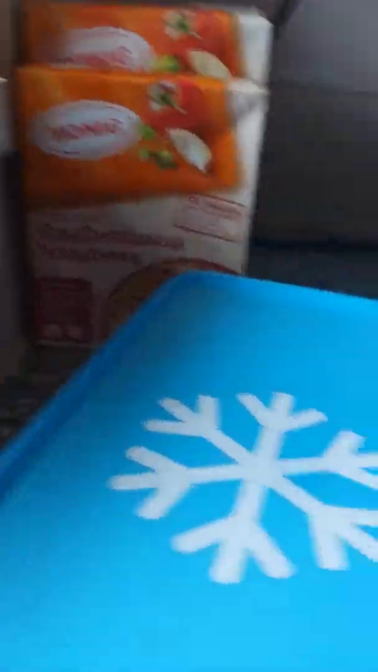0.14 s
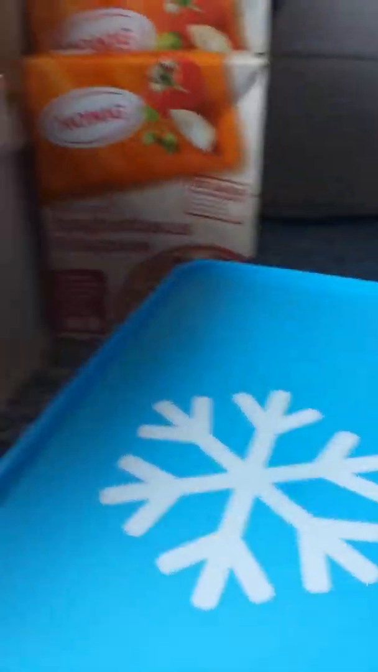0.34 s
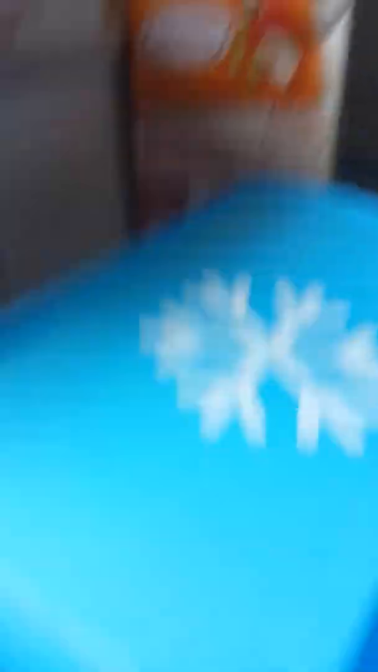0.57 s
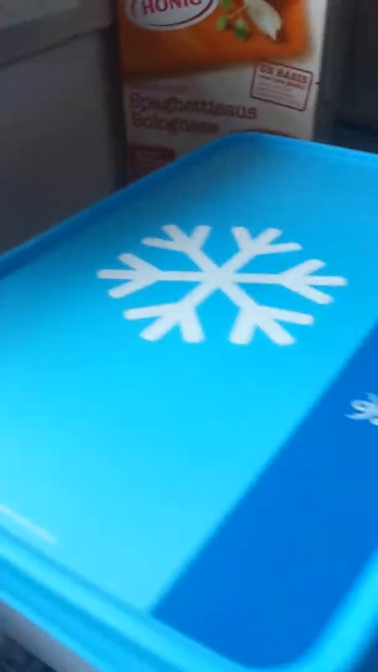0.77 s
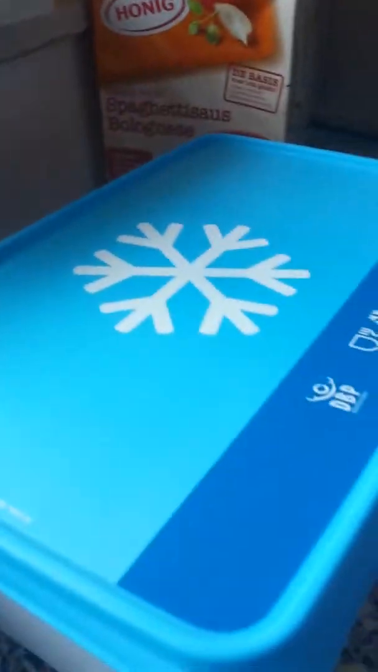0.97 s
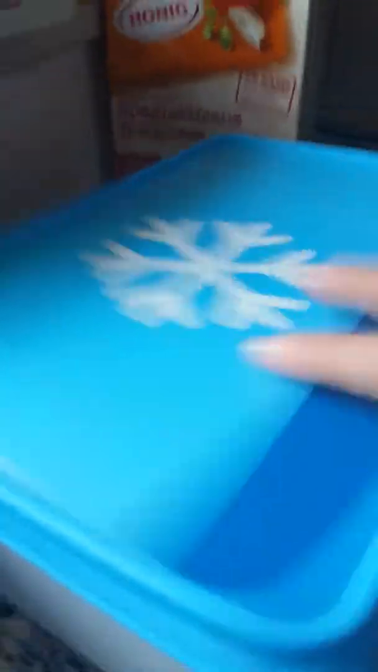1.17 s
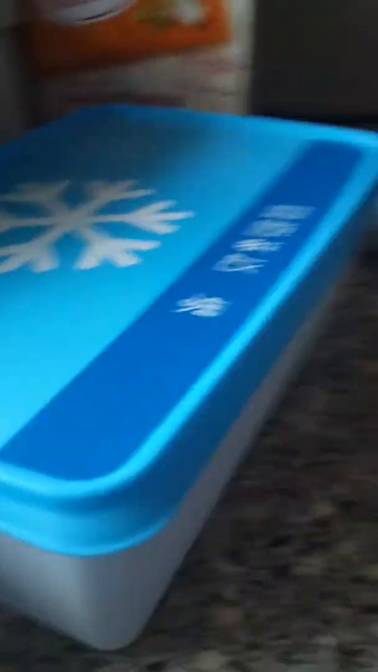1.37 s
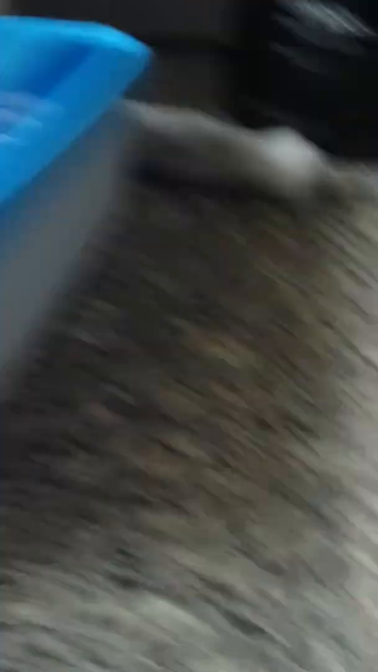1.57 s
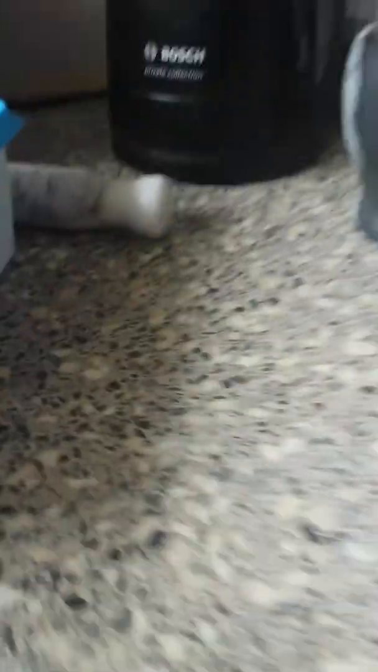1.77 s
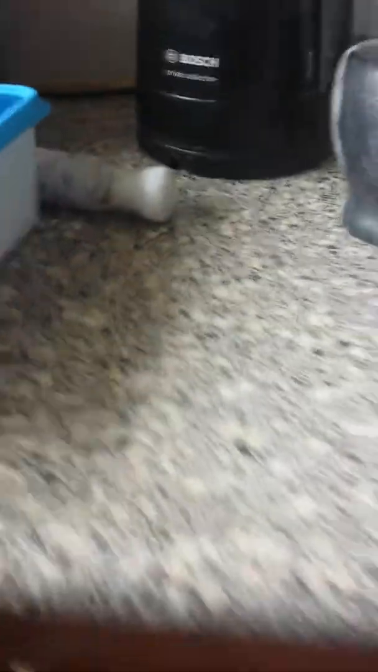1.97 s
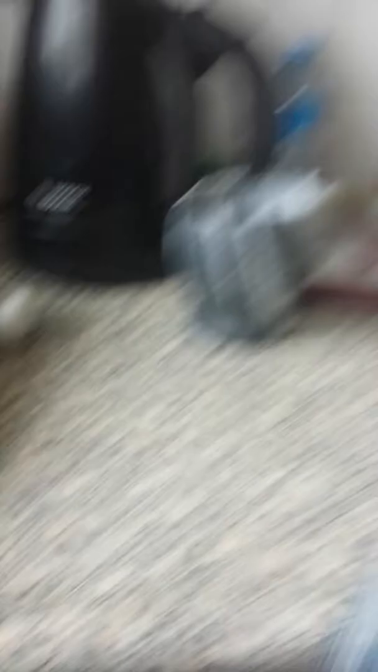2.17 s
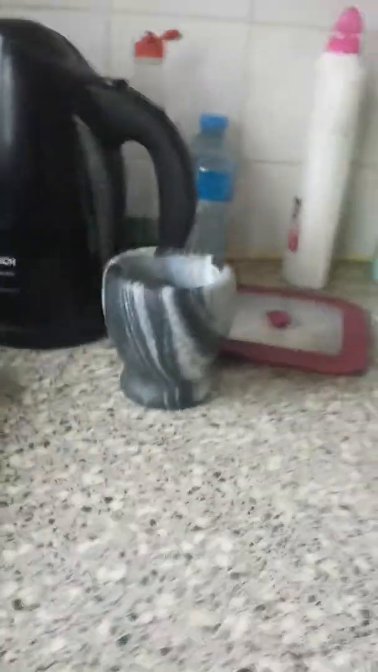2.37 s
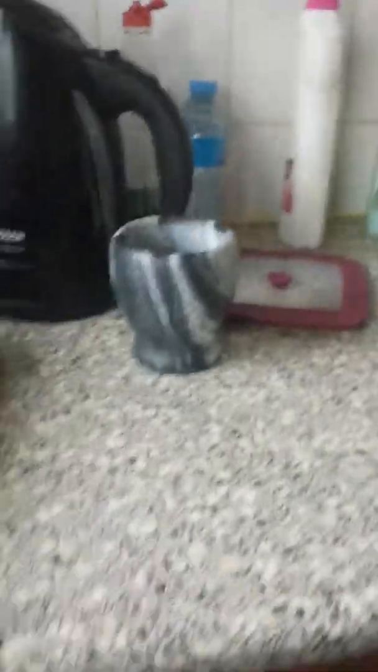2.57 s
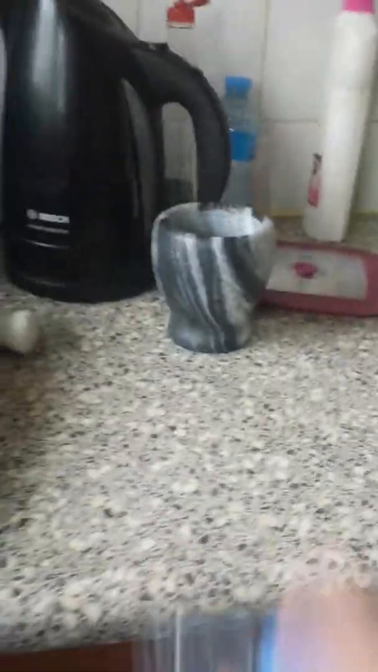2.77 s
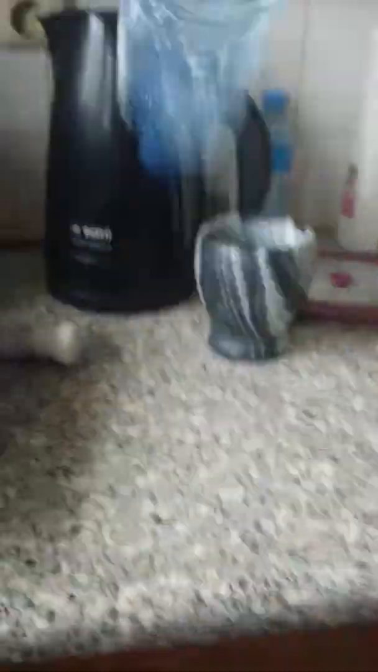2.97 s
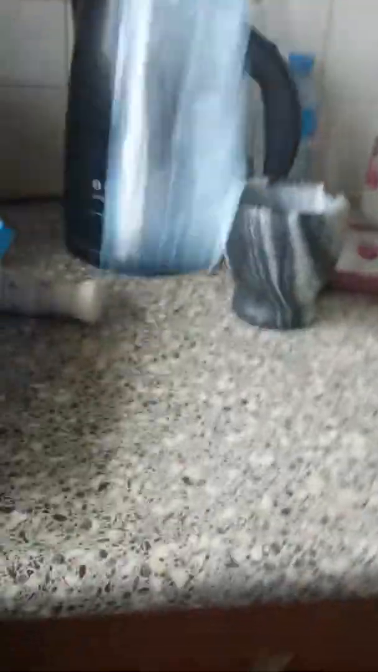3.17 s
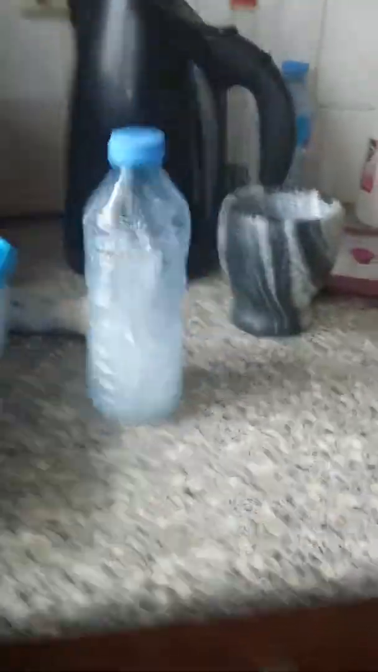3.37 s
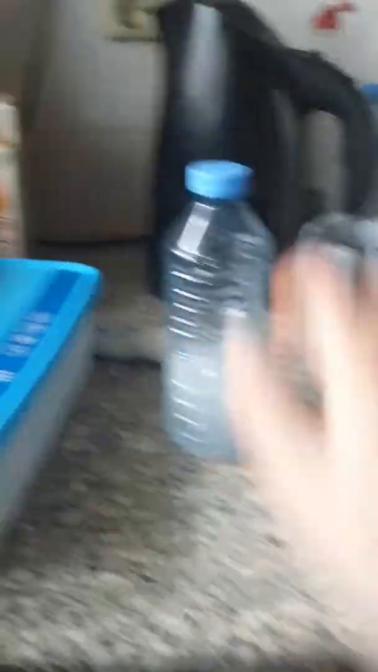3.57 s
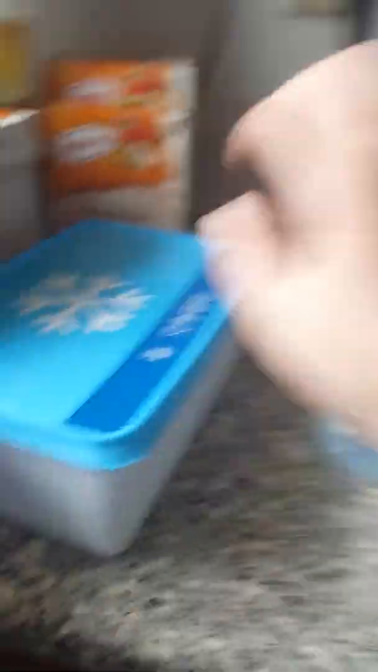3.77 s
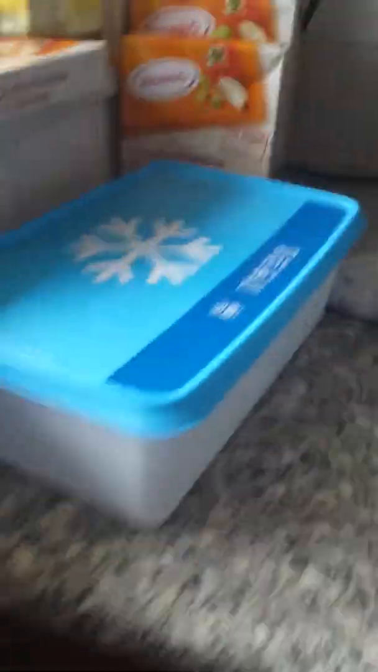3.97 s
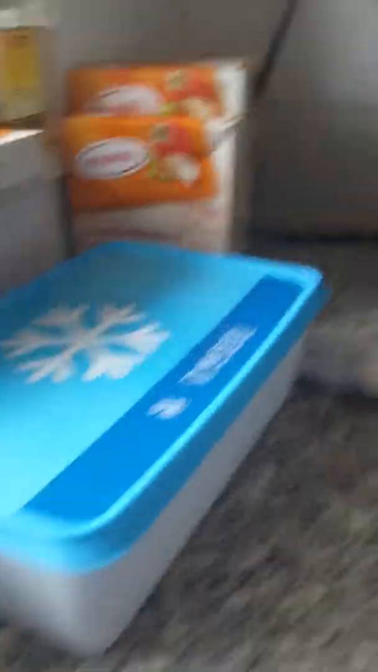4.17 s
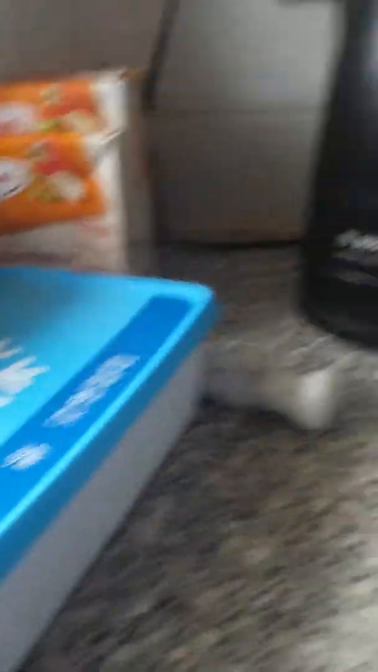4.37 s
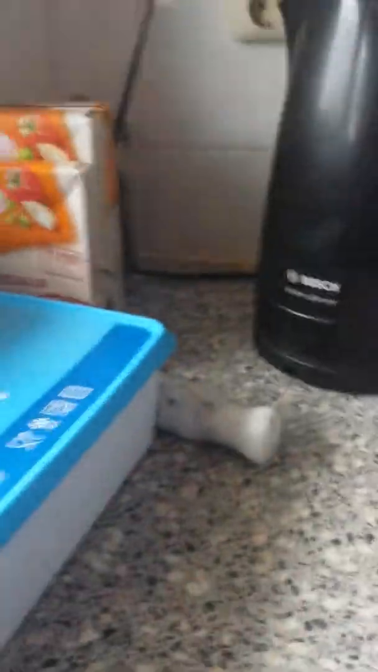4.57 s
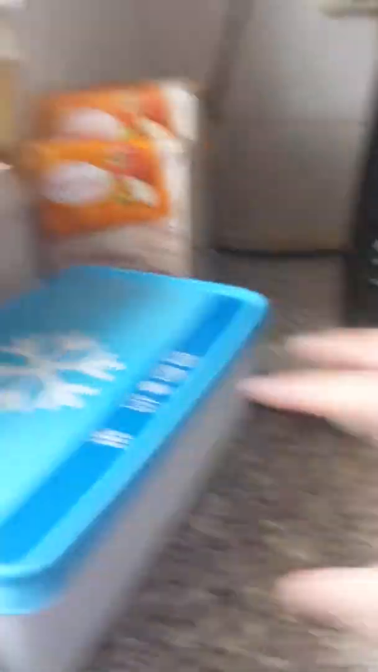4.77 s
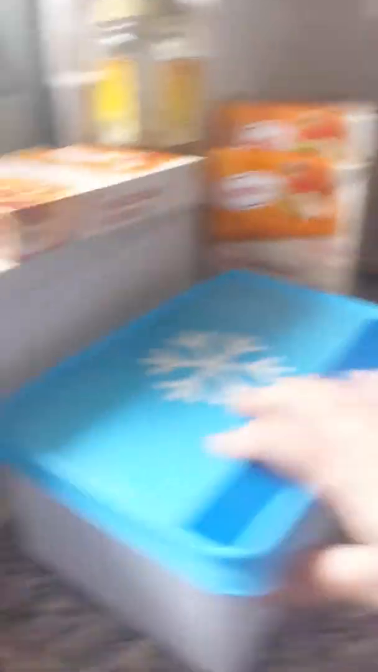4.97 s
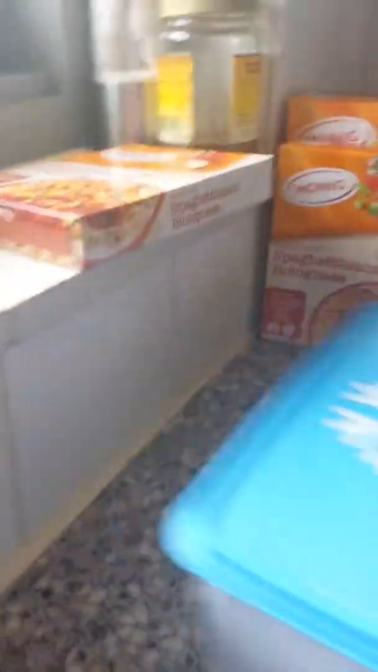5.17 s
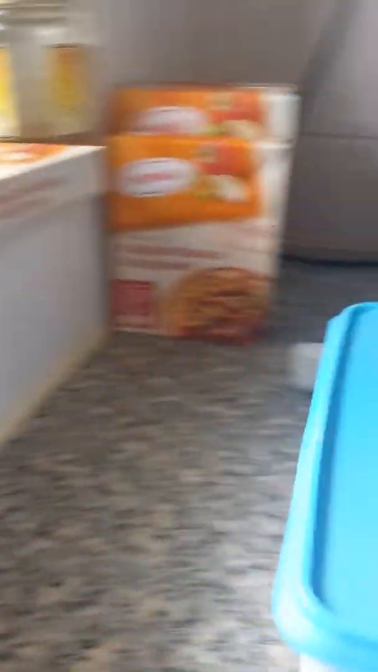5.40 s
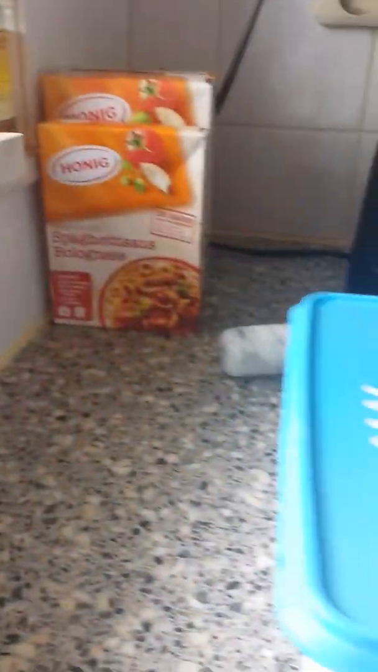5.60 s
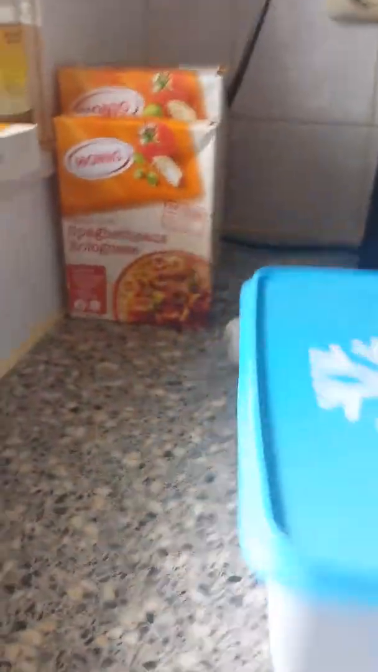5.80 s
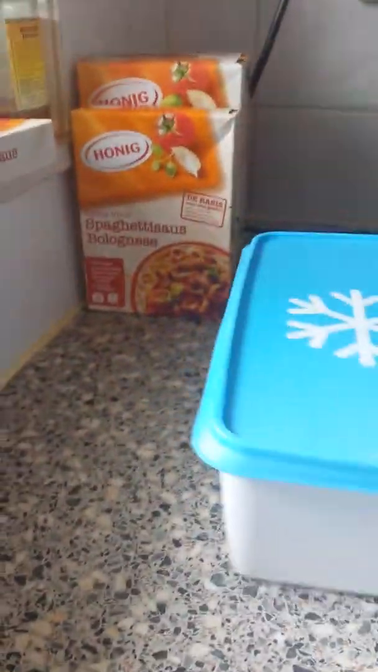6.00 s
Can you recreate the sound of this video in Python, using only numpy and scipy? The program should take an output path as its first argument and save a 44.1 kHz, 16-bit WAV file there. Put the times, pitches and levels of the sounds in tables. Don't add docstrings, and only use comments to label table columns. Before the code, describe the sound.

Near silence with tiny plastic ticks, then a lidded tub slides and bumps along stone, grit hissing beneath and walls booming. Light settling follows. A plastic water bottle snaps in the hand and slaps down hard, with a brief dull ring. Quiet crinkles follow, then a slight skin creak and a longer rough scrape with strong hollow knocks. Small tiled kitchen with short ring; close hand-held phone, snaps brightest on the right.

```python
import sys
import numpy as np
from scipy import signal
from scipy.fft import rfft, irfft, next_fast_len
from scipy.io import wavfile
from scipy.ndimage import uniform_filter1d

SR = 44100
rng = np.random.default_rng(int(sys.argv[2]) if len(sys.argv) > 2 else 0)


def voltage_ratio(level):
    return 10 ** (np.asarray(level, float) / 20)


def generate_wav(signal):
    frames = np.transpose(np.atleast_2d(signal))
    scaled = np.clip(frames, -1, 1) * 32767
    pcm = np.round(scaled).astype(np.int16)
    wavfile.write(sys.argv[1], SR, pcm)


N = 266364

# (frequency [Hz], width [Hz], level [dB])
BOOM_MODES = [(121, 88, 6), (142.4, 85, 8), (227, 17, -21)]
WALL_MODES = [(250, 56, -4), (294, 33, 3.5), (335, 20, -3), (361, 38, -5.5), (413, 18, -1), (473, 18, -9.5),
              (521, 26, -11), (576, 56, -18.5)]
LID_MODES = [(610, 430, 0.5), (793, 72, 8), (880, 107, 5), (983, 64, 7.5), (1086, 167, 1.5)]
LID_TOP_MODES = [(1630, 120, 0.5), (2314, 130, -0.43), (2644, 320, -3.1)]
# (frequency [Hz], level [dB per Hz])
GRIT_SPECTRUM = [(1180, -12), (2000, -2), (2300, 2.5), (3600, -2.5), (5350, 3), (7270, 3.5), (10200, -13.5),
                 (14900, -13), (15900, -54.5), (16300, -100.5)]
PATCH_HZ = (1800, 3200, 5600, 10000)
# (frequency [Hz], level [dB per Hz])
HUSH_SPECTRUM = [(15, -36.5), (34, -1.5), (50, 5.5), (106, 3.5), (190, -4.5), (264, -0.5), (755, -10),
                 (2540, -8.5), (3700, -51), (6520, -17), (14600, -19), (15600, -46)]
# (frequency [Hz], t60 [s])
TILES_T60 = [(100, 0.41), (300, 0.34), (1000, 0.34), (3000, 0.32), (8000, 0.35), (14000, 0.17)]
# (frequency [Hz], likeness [0-1])
PORT_LIKENESS = [(60, 1), (130, 0.87), (290, 1), (640, 0.37), (1410, 0), (3100, 0), (6820, 0.12),
                 (15000, 0)]
# (frequency [Hz], level [dB])
HAND_SHADOW = [(60, -7), (200, -3), (700, -2), (4400, -1.75), (8000, -6), (15000, -9.5)]
# (frequency [Hz], level [dB], t60 [s])
LEFTOVER_MODES = [(460, -45, 0.15), (1120, -39.5, 0.35), (2730, -44.5, 0.35), (3940, -38.5, 0.13),
                  (5740, -54, 0.33)]
# (frequency [Hz], level [dB per Hz])
TICK_SPECTRUM = [(1180, -32), (2000, 22.5), (6600, 8), (9000, -0.5), (11600, -3.5), (13800, -9.5),
                 (15500, -20), (16600, -30)]
# (frequency [Hz], level [dB], t60 [s])
BOTTLE_MODES = [(113, -27.5, 0.3), (149, -30, .25), (176, -31, 0.26), (214.5, -31, 0.3), (285, -21.5, 0.28),
                (326, -27.5, 0.3), (452, -28.5, 0.3), (571, -25, 0.27), (692, -33, .3), (931, -40.5, 0.28),
                (1024, -33, .3), (1520, -31.5, .3), (1756, -35.5, .25), (1730, -45, .3)]
# (time [s], level [dB])
LANDINGS = [
    (3.3157, 5.5),
    (3.3253, 6),
]

# (time [s], weight on the base [dB], speed over the grit [dB])
LET_GO = [(0.0, -49, -49), (0.18, -70.5, -60.5), (0.31, -80, -83), (0.55, -92.5, -62.5), (0.65, -81, -66)]
SLIDE_IN = [(0.67, -80, -62.5), (0.77, -46.5, -48.5), (0.91, -34, -38.5), (0.95, -39.5, -39),
            (1.028, -44, -43.5), (1.07, -64, -74)]
SHOVE = [(1.12, -79, -62), (1.2, -56, -45), (1.237, -37.5, -30), (1.326, -30.5, -33.5), (1.336, -39, -62),
         (1.39, -36.5, -49), (1.49, -56.5, -57.5), (1.582, -69, -46)]
SETTLE = [(1.621, -64.5, -33.5), (1.72, -52, -47), (1.82, -46.5, -41.5), (2.01, -56, -48),
          (2.22, -57.5, -57), (2.39, -58.5, -46.5), (2.63, -81, -62), (2.869, -105, -72.5)]
FLIP = [(2.886, -62, -49), (2.949, -82, -40), (3.063, -77, -36.5), (3.135, -55, -42), (3.203, -55.5, -48),
        (3.257, -49.5, -47)]
REACH = [(3.3, -70, -53), (3.389, -29.5, -27), (3.549, -92, -70.5), (3.731, -66.5, -53.5),
         (4.012, -77, -70.5)]
PICK_UP = [(4.017, -50, -38.5), (4.05, -50, -42), (4.255, -87.5, -65.5), (4.393, -72, -54),
           (4.497, -55.5, -51.5), (4.573, -50, -70), (4.713, -73.5, -57), (4.87, -76, -65)]
SLIDE_BACK = [(4.876, -66, -60), (4.955, -64, -49), (5.0, -62, -47), (5.072, -46, -43.5), (5.138, -32, -37),
              (5.202, -32, -31), (5.27, -29, -34), (5.378, -35, -40.5), (5.44, -35, -44)]
NUDGE = [(5.471, -32, -35.5), (5.558, -30.5, -39), (5.64, -34, -61), (5.74, -33.5, -44.5),
         (5.9, -35.5, -36.5), (6.04, -35, -42.5)]
# (loudest wall pitch [Hz], counter boom [dB], lid rattle [dB], middle of the hiss [dB])
GRIPS = [
    (302, 2, -3, -2),
    (490, -1, -2, -5.5),
    (298, -6, -3.5, -3.5),
    (374, 2, -6.5, -1),
    (324, 8, -12, -2.5),
    (345, 3, -1.5, 0.5),
    (367, 4, -9.5, 0.5),
    (335, -3.5, -0.5, 2.5),
    (347, 0, -3, 0),
]

# (time [s], peak level [dB], ring [Hz], duller knock, relative [dB])
BOX_SNAPS = [(0.0014, -34.5, 2600, -2), (1.2396, -23, 3220, 3), (1.254, -17.5, 5200, 4),
             (1.3055, -19, 3060, 0), (1.3483, -15, 7520, -1.5), (1.3528, -14, 7060, -6.5),
             (1.354, -21, 3020, 2), (1.6105, -13.5, 4220, -21), (1.6097, -16.5, 7200, -20),
             (1.613, -36, 2830, -31), (1.633, -35, 3570, -16), (1.27, -21, 4450, -2),
             (1.288, -32, 6000, -3.5), (1.325, -37, 5500, -6), (5.147, -20, 1900, 4),
             (5.257, -29, 2630, -6), (5.338, -23, 2500, -3), (1.349, -24, 3570, -12),
             (5.189, -41, 5900, -6), (5.223, -34, 5500, -7), (5.54, -31, 6500, -3), (1.8243, -33, 7600, 2),
             (2.4094, -32, 5650, -5), (4.9704, -23, 6500, -1.5), (5.257, -24.5, 7000, -18),
             (5.2948, -17, 2590, -9), (5.3366, -20, 6650, 0.5), (5.471, -49, 6320, -12),
             (5.6015, -30, 2570, 4), (5.935, -18.5, 7500, -1)]
BOTTLE_SNAPS = [(2.9054, -36.5, 7900, 0), (2.9393, -20.5, 7150, -10), (2.906, -36, 2700, -7.5),
                (2.94, -32.5, 2800, -11.5), (3.06, -39, 2450, -19), (3.317, -15, 2400, -16),
                (3.0125, -31, 6800, -27), (3.1377, -25.5, 6330, -19), (3.1766, -33.5, 7100, -16),
                (3.3156, -10.5, 7240, 0), (3.3186, -5.5, 3700, -13), (3.3192, -10, 1730, -11),
                (3.3256, -6, 6340, -5), (3.354, -12.5, 2440, -8.5), (4.018, -31, 4500, -29),
                (4.0474, -33.5, 7000, -12), (4.1057, -17, 6410, -10), (4.1068, -27, 2740, -29),
                (4.4046, -37, 2470, 13), (4.4352, -38.5, 5700, -20), (4.4894, -46, 7000, 10),
                (4.498, -39.5, 7400, -10), (4.5043, -28.5, 2070, -0.5)]
# (time [s], peak level [dB], ring [Hz])
RELAXING_TICKS = [(0.17, -64, 5950), (0.2463, -42, 2310), (0.259, -53, 4700), (0.271, -51, 4730),
                  (0.301, -49.5, 5830), (0.337, -51, 1780), (0.479, -50.5, 4470), (0.5204, -49, 2430),
                  (0.545, -52, 6200), (0.5733, -46, 7300), (1.1616, -33.5, 4800), (1.562, -32.5, 5320),
                  (2.211, -36.5, 6370), (2.8835, -50, 6700), (2.6, -47, 5540), (2.614, -51.5, 5900),
                  (4.885, -37.5, 4500), (3.204, -45, 6900), (3.5105, -30, 6400), (3.662, -48, 3970),
                  (3.8132, -45.5, 5240), (3.916, -45, 6500), (3.9545, -42, 5600), (3.9684, -41.5, 6550),
                  (4.3208, -40, 6350), (4.353, -47, 4580), (4.4724, -44, 6930), (4.53, -37.5, 6700),
                  (4.82, -67, 4000), (5.07, -50, 5500)]
# (left minus right [dB], share into the room [dB])
SNAP_PLACES = [
    (-24, 2.5),
    (-26, 4),
    (19, -0.5),
]
# (time [s], peak level [dB], low mode [Hz], t60 [s])
THUMPS = [(0.607, -31, 148, 0.07), (0.663, -28, 234, 0.027), (0.999, -23, 128, 0.27),
          (1.03, -28, 125, 0.13), (1.21, -18.5, 104, 0.34), (1.354, -9.5, 219, 0.054),
          (1.393, -18, 140.5, 0.098), (1.466, -24, 184, 0.094), (1.634, -17.5, 119.6, 0.03),
          (1.827, -32, 133, 0.092), (1.925, -24, 121, 0.078), (2.414, -17, 185, 0.083),
          (2.904, -26, 217, 0.087), (2.936, -30, 180.7, 0.4), (3.092, -31, 151, 0.13),
          (4.017, -28, 113, 0.038), (4.4, -30, 258, 0.09), (4.548, -26, 113, 0.088),
          (4.978, -11, 146, 0.065), (5.256, -4, 196, 0.065), (5.335, -2, 196.3, 0.18),
          (5.604, -19.5, 167.7, 0.4), (5.712, -36, 217, 0.18), (5.933, 2, 193, 0.092),
          (5.95, -11, 148.5, .15), (3.3169, -5.5, 228, 0.055), (3.325, -7, 173, 0.061)]
# (time [s], peak level [dB], wall mode [Hz], t60 [s])
TAPS = [(0.606, -27, 272, 0.067), (1.01, -19.5, 229.4, 0.099), (1.038, -26.5, 254, 0.12),
        (1.209, -25.5, 285, 0.25), (1.233, -8, 325, 0.13), (1.304, -11.5, 336.5, 0.092),
        (1.312, -11, 335, 0.21), (1.354, -4.5, 275, 0.072), (1.396, -11, 303.5, 0.13),
        (1.609, -3.5, 335, 0.036), (1.773, -26, 305, 0.091), (1.924, -25, 367, 0.043),
        (2.456, -18.5, 284, 0.023), (2.904, -17, 300, 0.017), (2.938, -24.5, 285, 0.31),
        (3.007, -28, 284, 0.15), (3.208, -21, 489, 0.033), (3.207, -34, 985, 0.073),
        (4.019, -36, 430, 0.031), (4.047, -18, 414, 0.025), (4.106, -35.5, 294, 0.16),
        (4.401, -27, 458, 0.073), (4.502, -28, 490, 0.067), (4.969, -5, 380, 0.062), (5.12, -15, 360, 0.36),
        (5.361, -7.5, 327.5, 0.12), (5.6, -17.5, 435, 0.19), (5.5996, -11.5, 817, 0.034),
        (5.712, -10, 329.5, 0.27), (5.791, -11, 391, 0.15), (5.835, -11, 335, 0.22),
        (5.933, -4.5, 340, 0.24), (5.599, -15, 570, 0.078), (5.61, -31, 1004, 0.067),
        (5.494, -16, 442, 0.12), (2.939, -23.5, 466, 0.095), (5.878, -19, 345, 0.16),
        (5.978, -13, 431, 0.11), (5.136, -14, 840, .05), (5.147, -15, 940, 0.046), (5.52, -14, 333, 0.079),
        (5.65, -17, 398, 0.14), (5.288, -26, 980, .05), (5.473, -33, 570, .06), (5.075, -17.5, 313, 0.088),
        (4.075, -28, 760, .05), (4.084, -29, 990, 0.047), (4.107, -38, 830, 0.018),
        (4.404, -34, 1450, 0.026), (4.409, -32, 1210, 0.033), (1.634, -23, 750, 0.046),
        (2.94, -25, 880, 0.043), (1.613, -34, 2880, 0.12)]
# (pitch ratio, level [dB])
THUMP_WAKES_WALL = (1.75, -7.5)
TAP_WAKES_BASE = (0.49, -11)
# (start [s], end [s], rate [Hz], unevenness [0-1], ring [Hz], peak level [dB])
CREAKS = [
    (1.176, 1.212, 150, .3, 4800, -38),
    (4.877, 5.05, 190, .04, 4450, -33),
]
# (start [s], end [s], pitch [Hz], level [dB])
WHISTLE = (2.76, 2.84, 4188, -72)

PORT_LAG = 9
COUNTER_HZ = 121
SLOSH_T60_S = 0.24
HUSH_DB, PATCH_DB, TICK_KNOCK_DB = -68, 2.2, -11.5
LID_FROM_SPEED = 0.65
RUB_PAN_DB, RUB_PAN_PER_DB = 3, -0.27
WALL_RISE = 0.014
CREAK_CATCH = 1.0
BEAM_HZ = 7000


def read(table, hz):
    table_hz, values = np.transpose(table)
    return np.interp(np.log(np.maximum(hz, 1)), np.log(table_hz), values)


def shape(x, gain):
    size = next_fast_len(x.shape[-1])
    spectrum = rfft(x, size) * gain(np.fft.rfftfreq(size, 1 / SR))
    return irfft(spectrum, size)[..., :x.shape[-1]]


def unit(x):
    return x / np.sqrt(np.mean(x ** 2))


def ring(x, hz, width_hz):
    return signal.lfilter(*signal.iirpeak(hz, hz / width_hz, SR), x)


def body(x, modes):
    return sum((-1) ** k * voltage_ratio(db) * ring(x, hz, width) for k, (hz, width, db) in enumerate(modes))


def above(x, hz):
    return signal.sosfilt(signal.butter(3, min(hz, SR / 3), "high", fs=SR, output="sos"), x)


def diffuse(size):
    mid, side = rng.standard_normal((2, size))
    like = lambda hz: np.clip(read(PORT_LIKENESS, hz), -0.9, 0.99)
    mid = shape(mid, lambda hz: np.sqrt(1 + like(hz)))
    side = shape(side, lambda hz: np.sqrt(1 - like(hz)))
    return np.array([mid + side, mid - side]) / 2 ** 0.5


def slips(rate_hz, spread_db):
    when, sign, size = rng.random((3, N))
    size = voltage_ratio(spread_db * np.minimum(-np.log(1 - size), 4.5))
    return (when < rate_hz / SR) * np.sign(sign - 0.5) * size


def walk(rate_hz):
    hold = int(SR / rate_hz)
    levels = rng.standard_normal(N)[np.arange(N) // hold]
    return 1.37 * uniform_filter1d(levels, hold)


def sides(pan_db):
    return voltage_ratio(np.array([pan_db, -pan_db]) / 2)


def add(out, s, sound):
    i = int(s * SR)
    out[..., i:i + sound.shape[-1]] += sound[..., :N - i]


def sine(hz, t):
    return np.sin(2 * np.pi * hz * t)


def hush():
    noise = shape(diffuse(N), lambda hz: voltage_ratio(read(HUSH_SPECTRUM, hz)))
    return unit(noise) * voltage_ratio(HUSH_DB + 2.0)


def leftover():
    t = np.arange(SR // 2) / SR
    tail = 0
    for hz, db, t60 in LEFTOVER_MODES:
        mode = unit(ring(diffuse(len(t)), hz, 0.073 * hz))
        tail = tail + voltage_ratio(db - 60 * t / t60) * mode
    return np.pad(tail, ((0, 0), (0, N - len(t))))


def hand():
    gestures = (LET_GO, SLIDE_IN, SHOVE, SETTLE, FLIP, REACH, PICK_UP, SLIDE_BACK, NUDGE)
    points = [row + grip for rows, grip in zip(gestures, GRIPS) for row in rows]
    s, *columns = np.transpose(points)
    s = np.maximum.accumulate(s)
    return [np.interp(np.arange(N) / SR, s, column) for column in columns]


def shaken_walls(wall_db, wall_hz, boom_db):
    heavy = slips(rate_hz=600, spread_db=-2.5)
    lean = [voltage_ratio(db - 43.0 * np.log2(hz / wall_hz) ** 2) for hz, _, db in WALL_MODES]
    wall = sum(g * unit(ring(heavy, hz, width)) for g, (hz, width, _) in zip(lean, WALL_MODES))
    wall = wall / np.sqrt(np.sum(np.square(lean), axis=0))
    boom = unit(body(heavy, BOOM_MODES))
    return boom * voltage_ratio(boom_db - 7.0) + wall * voltage_ratio(wall_db - 0.5)


def grit_hiss(fine, middle_db):
    hiss = 0
    for k in range(len(PATCH_HZ)):
        only_k = np.arange(len(PATCH_HZ)) == k
        part = lambda hz: np.interp(np.log(hz + 1), np.log(PATCH_HZ), only_k)
        band = shape(fine, lambda hz: voltage_ratio(read(GRIT_SPECTRUM, hz)) * part(hz))
        hiss = hiss + band * voltage_ratio(PATCH_DB * walk(rate_hz=18) + middle_db * (k == 0))
    return unit(hiss)


def rubbing():
    wall_db, grit_db, wall_hz, boom_db, lid_db, middle_db = hand()
    boom_db = boom_db + wall_db
    lid_db = lid_db + wall_db + LID_FROM_SPEED * (grit_db - wall_db)
    pan_db = RUB_PAN_DB + RUB_PAN_PER_DB * (grit_db + 49.5)
    wall_hz = wall_hz * 2 ** (WALL_RISE * (grit_db + 45.5))
    low = shaken_walls(wall_db, wall_hz, boom_db)
    shared, left, right = (slips(rate_hz=8700, spread_db=4.0) for _ in range(3))
    fine = 0.084 * shared + np.array([left, right])
    lid_sway_db, grit_sway_db = 2.8 * walk(rate_hz=40), 2.3 * walk(rate_hz=50)
    lid = unit(body(fine, LID_MODES)) + unit(body(fine, LID_TOP_MODES)) * voltage_ratio(middle_db - 10.5)
    high = lid * voltage_ratio(lid_db + 0.5 + lid_sway_db)
    high = high + grit_hiss(fine, middle_db) * voltage_ratio(grit_db + grit_sway_db)
    return low + high * sides(pan_db)


def snaps():
    near, far, t = np.zeros((2, N)), np.zeros(N), np.arange(2048) / SR
    lead = 64
    first = 1.0 * (np.arange(len(t)) == lead)
    tick = shape(first, lambda hz: voltage_ratio(read(TICK_SPECTRUM, hz)))
    knock = unit(ring(ring(first, 866.0, 1200.0), 866.0, 1200.0))
    fade = voltage_ratio(-60 * t / 0.023)
    ticks = [row + (TICK_KNOCK_DB,) for row in RELAXING_TICKS]
    groups = zip((BOX_SNAPS, BOTTLE_SNAPS, ticks), SNAP_PLACES)
    creases = [row + place for rows, place in groups for row in rows]
    for s, db, hz, knock_db, pan_db, room_db in creases:
        mode = unit(ring(ring(first, hz, 0.19 * hz), hz, 0.19 * hz))
        top = unit(above(above(tick, 0.65 * hz), 0.65 * hz))
        dull = voltage_ratio(knock_db) * knock
        cracks = rng.standard_normal(len(t)) * (rng.random(len(t)) < 0.25) * fade
        cracks[0] = 2.6
        snap = signal.fftconvolve(unit(mode + voltage_ratio(-5.0) * top) + dull, cracks)[:len(t)]
        gain = voltage_ratio(db) / np.abs(snap).max()
        pan = sides(pan_db * min(hz / BEAM_HZ, 1) ** 2)[:, None]
        add(near, max(s - lead / SR, 0), gain * snap * pan)
        add(far, s, gain * voltage_ratio(room_db) * (voltage_ratio(-1.5) * mode + top + dull))
    return near, far


def thuds():
    near, far, t = np.zeros(N), np.zeros(N), np.arange(8192) / SR
    wall_ratio, woken_wall_db = THUMP_WAKES_WALL
    base_ratio, woken_base_db = TAP_WAKES_BASE
    blows = [(s, db, hz, hz * wall_ratio, woken_wall_db, t60) for s, db, hz, t60 in THUMPS]
    blows += [(s, db + woken_base_db, hz * base_ratio, hz, -woken_base_db, t60) for s, db, hz, t60 in TAPS]
    for s, db, low_hz, wall_hz, wall_db, t60 in blows:
        fade = voltage_ratio(-60 * t / max(t60, 0.02)) * np.minimum(t / 0.0026, 1)
        low = sine(low_hz, t) + 0.097 * sine(COUNTER_HZ, t) + 0.16 * sine(low_hz * 0.8, t)
        wall = sine(wall_hz, t) + 0.1 * sine(wall_hz * 1.3, t)
        thud = voltage_ratio(db - 5.5) * fade * (low + voltage_ratio(wall_db) * wall)
        add(near, s, thud)
        add(far, s, thud * np.exp(-t / 0.0038))
    return near, far


def kitchen(dry):
    t, noise, echo = np.arange(SR // 2) / SR, diffuse(SR // 2), 0
    for hz in 60 * 2 ** np.arange(0, 8.1, 0.5):
        t60 = read(TILES_T60, hz)
        band = shape(noise, lambda f: np.clip(1 - 2 * np.abs(np.log2(np.maximum(f, 60) / hz)), 0, 1))
        echo = echo + band * voltage_ratio(-60 * t / t60) / np.sqrt(t60)
    echo = echo * np.clip((t - 0.002) / 0.008, 0, 1)
    echo = echo / np.sqrt(np.sum(echo ** 2) / 2)
    return signal.fftconvolve(dry.mean(axis=0)[None], echo, axes=1)[:, :N]


def creak():
    out, k = 0, np.arange(32)
    for start, end, rate_hz, uneven, hz, db in CREAKS:
        pulses = np.zeros(N)
        gap, size = rng.standard_normal(size=(32, 2)).T
        catch = CREAK_CATCH * 0.5 ** k + 0.001 * k ** 2
        gaps = (1 + catch + uneven * np.clip(gap, -2, 2)) / rate_hz
        s = start + np.cumsum(gaps) - gaps
        pulses[(s * SR).astype(int)] = voltage_ratio(1.5 * size - 6 * 0.6 ** k) * (s < end)
        lower = ring(ring(pulses, hz, 650.0), hz, 650.0)
        upper = ring(ring(pulses, 1.36 * hz, 1300.0), 1.36 * hz, 1300.0)
        sound = lower + 0.7 * upper
        out = out + voltage_ratio(db) * sound / np.abs(sound).max()
    return out


def whistle():
    start, end, hz, db = WHISTLE
    t = np.arange(N) / SR
    swell = np.sin(np.pi * np.clip((t - start) / (end - start), 0, 1))
    return voltage_ratio(db) * sine(hz, t) * np.sqrt(np.clip(swell, 0, 1))


def landing():
    near, far, t = np.zeros(N), np.zeros(N), np.arange(SR // 2) / SR
    modes = 0
    for hz, db, t60 in BOTTLE_MODES:
        waver_db = 2.4 * walk(rate_hz=68)[:len(t)]
        modes = modes + voltage_ratio(db - 60 * t / min(t60, SLOSH_T60_S) + waver_db) * sine(hz, t)
    for s, db in LANDINGS:
        add(near, s, voltage_ratio(db) * modes)
        add(far, s, voltage_ratio(db) * modes * np.exp(-t / 0.0092))
    return near, far


def scene():
    rub = rubbing() + creak()
    snap, snap_far = snaps()
    thud, thud_far = thuds()
    bottle, bottle_far = landing()
    direct = rub + snap + thud + bottle
    direct[0] = np.roll(direct[0], PORT_LAG)
    to_room = voltage_ratio(-5.0) * rub + voltage_ratio(10.0) * snap_far + voltage_ratio(5.5) * thud_far + voltage_ratio(-6.5) * bottle_far
    heard = direct + kitchen(to_room)
    return above(above(heard, hz=99.4), hz=58.0) + leftover() + hush() + whistle()


def band_limit(x):
    return signal.sosfilt(signal.butter(12, 16450, fs=SR, output="sos"), x)


def record(dry):
    left = shape(dry[0], lambda hz: voltage_ratio(read(HAND_SHADOW, hz) / 2))
    right = shape(dry[1], lambda hz: voltage_ratio(-read(HAND_SHADOW, hz) / 2))
    overloaded = np.tanh(np.array([left, right]) / 1.3) * 1.3
    top_cut = signal.ellip(8, 0.2, 60, 15500.0, fs=SR, output="sos")
    heard = signal.sosfilt(top_cut, overloaded)
    return band_limit(np.clip(heard, -1, 1))


dry = scene()
out = record(dry)
generate_wav(out)
```